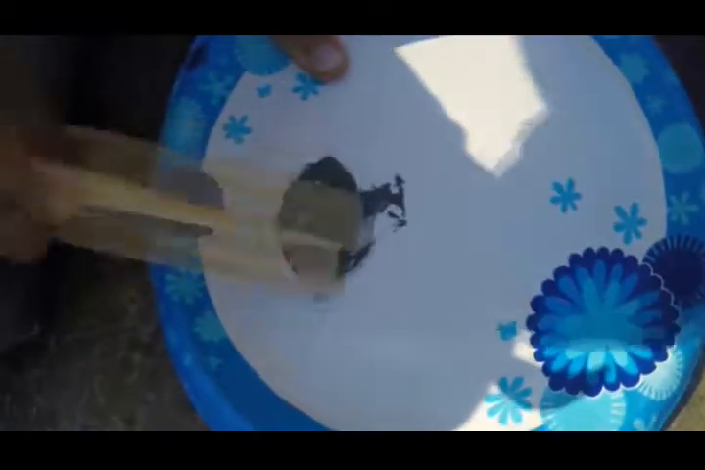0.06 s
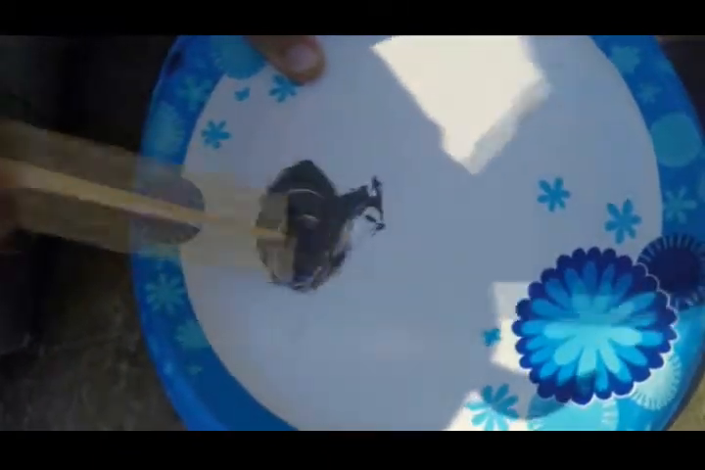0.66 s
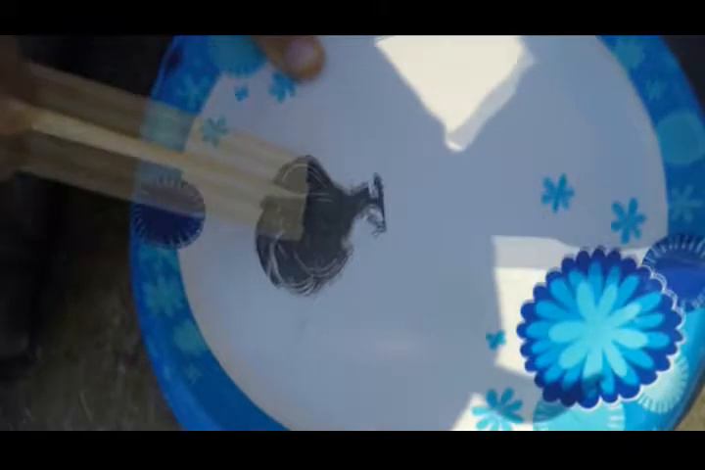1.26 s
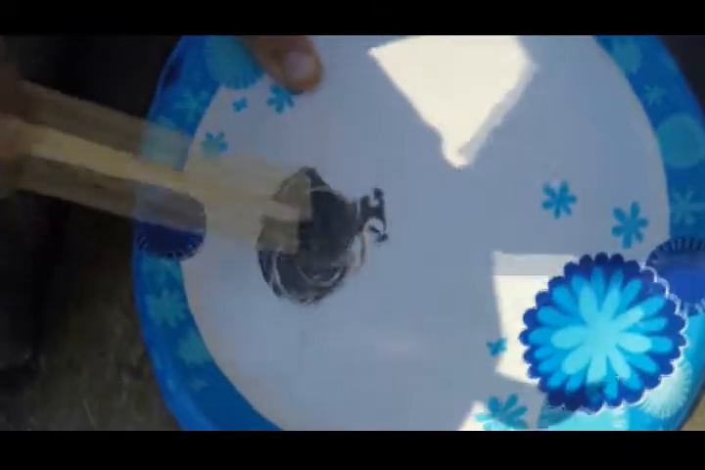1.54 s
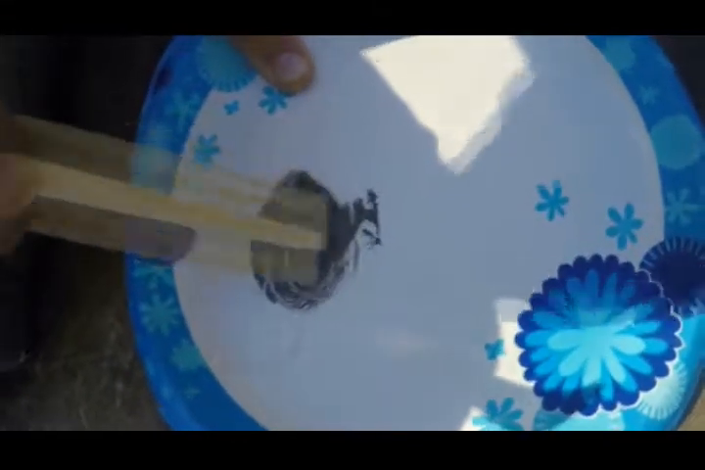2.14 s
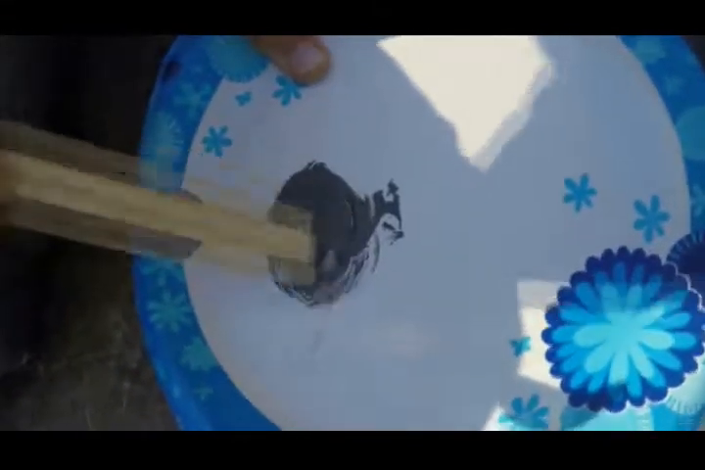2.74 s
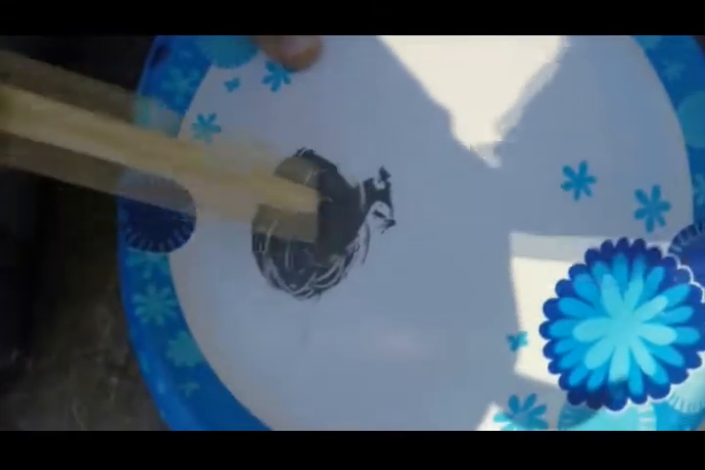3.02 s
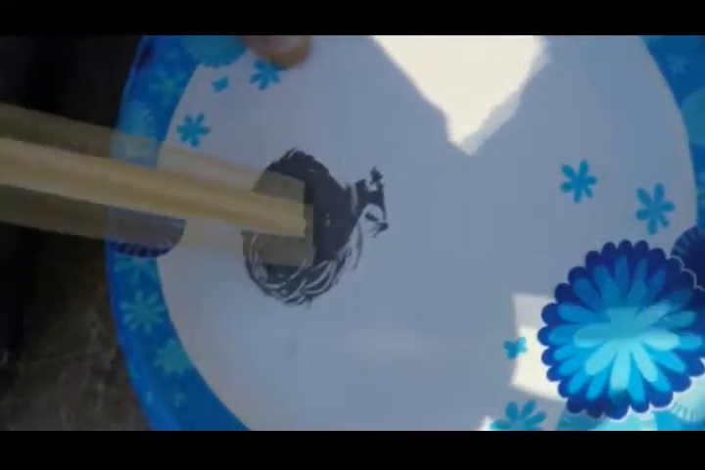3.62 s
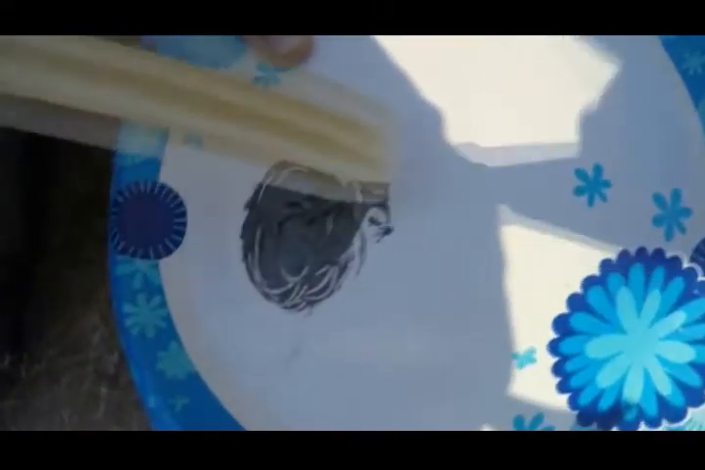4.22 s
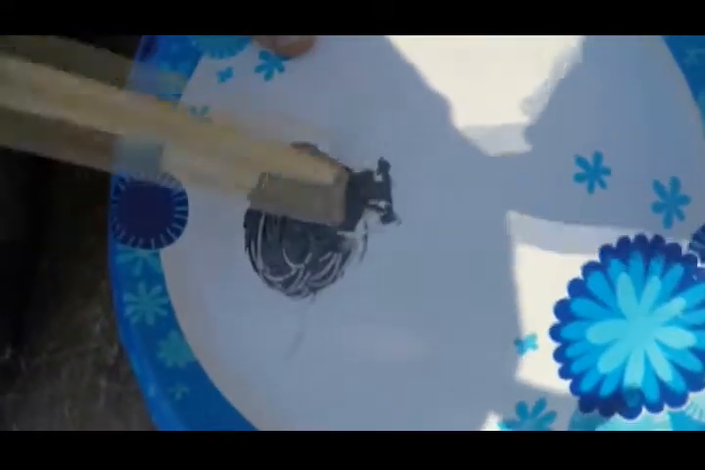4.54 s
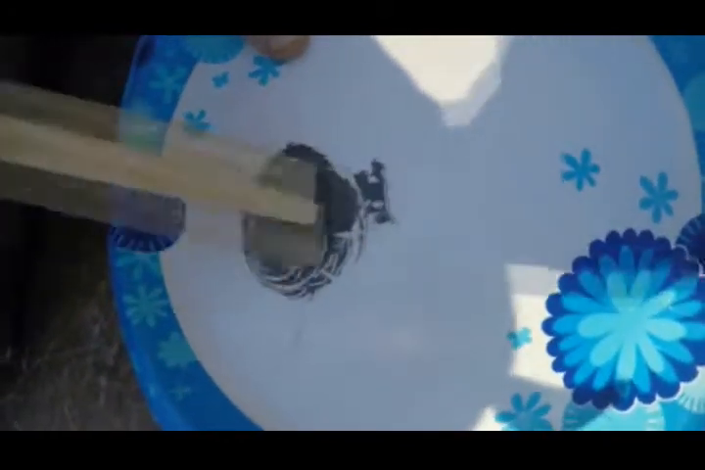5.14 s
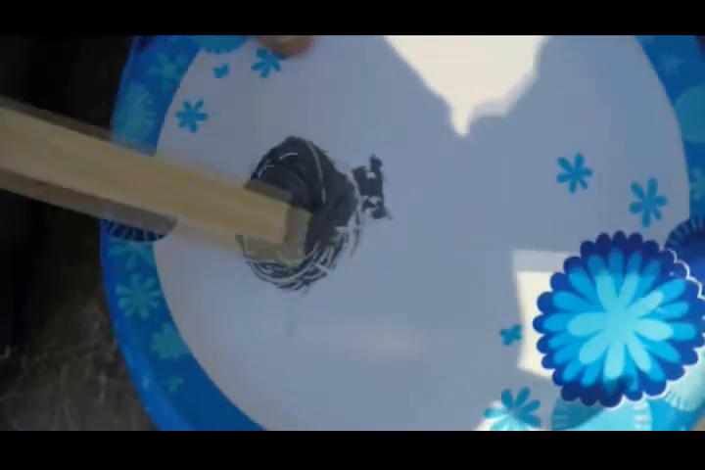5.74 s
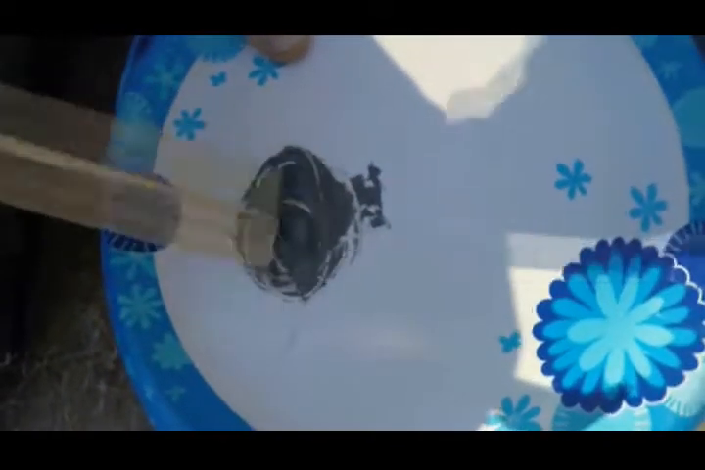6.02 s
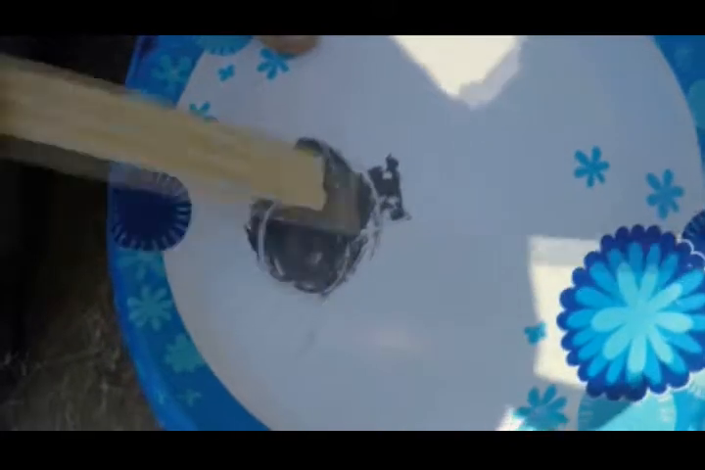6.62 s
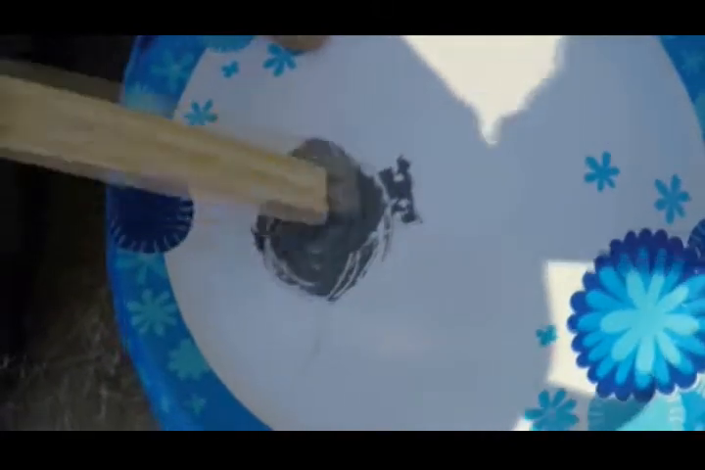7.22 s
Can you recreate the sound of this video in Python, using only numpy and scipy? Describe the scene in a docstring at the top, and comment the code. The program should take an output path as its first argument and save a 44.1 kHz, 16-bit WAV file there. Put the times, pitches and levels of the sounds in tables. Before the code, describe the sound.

Flat wooden sticks stir stiff putty on a hand-held paper plate, outdoors and close to the microphone. From the start, the paste drags with a quiet, fine hiss that swells with each push and crackles as sticky threads snap. Short, dry rasps come irregularly, often several a second, where wood bites the paper, some crisp and some slightly hollow. These thin out between about 2 and 3.5 seconds while the drag continues. The sticks lift at around 4.1 seconds and dip back at 4.5. Scraping carries on, with stronger strokes near 5.6 seconds, a tiny break at 7.1 and the sharpest scrape just after, continuing to about 7.5 seconds. Soft, deep handling knocks sit underneath, clearest near 0.1, 0.7, 1.3 and 3.2 seconds, with a lighter one at 6.4. A low breeze rumble on the microphone and a faint, even hiss run throughout.

```python
"""Stirring epoxy putty on a paper plate

Outdoors, close to the microphone, flat wooden sticks work stiff putty on a hand-held paper plate.
The putty drags with a fine hiss and crackles as its threads snap; where wood reaches paper it rasps
and rings sticks and plate. Underneath lie soft handling knocks, the low rumble of a breeze on the
microphone and an even hiss."""
import sys
import numpy as np
from scipy import signal
from scipy.fft import rfft, irfft
from scipy.io import wavfile
from scipy.ndimage import map_coordinates

SR = 44100
rng = np.random.default_rng(int(sys.argv[2]) if len(sys.argv) > 2 else 0)


def to_wav(sig):
    """Store sig (one row per channel, or 1-D mono) as 16-bit WAV at the path in sys.argv[1].

    Samples outside -1..1 are clipped; the rate is SR.
    """
    pcm = np.clip(np.atleast_2d(sig), -1, 1) * 32767
    pcm = np.round(pcm).astype(np.int16)
    wavfile.write(sys.argv[1], SR, pcm.T)  # frames by channels


N = 329250

# moving air on the microphone: (frequency [Hz], gain [dB])
RUMBLE_SPECTRUM = [(8, -52), (17, -1), (29, 0.5), (40, -1.5), (52, -8.5), (68, -13.5), (92, -18.5),
                   (120, -18), (160, -25), (240, -33), (500, -52)]
# still outdoor air and steady hiss: (frequency [Hz], gain [dB])
HISS_SPECTRUM = [(100, -6), (180, 0.5), (300, 0), (500, -2.5), (1000, -7), (2000, -6), (4000, -8),
                 (7000, -14.5), (11000, -18), (15500, -21.5)]
# spells with the sticks in the putty: (dip in [s], lift out [s])
STIR_SPELLS = [(-0.1, 4.14), (4.466, 7.11), (7.21, 7.6)]
# how hard the hand bears down, heard as steady drag: (time [s], relative level [dB])
HAND_EFFORT = [(0, -54.5), (0.4, -54.5), (0.9, -52.5), (1.1, -55), (1.35, -56), (1.55, -57), (2.2, -57),
               (3.0, -57), (3.45, -56), (3.9, -53.5), (4.6, -57), (5.1, -55.5), (5.44, -59), (5.6, -56.5),
               (6.3, -55.5), (6.8, -55.5), (7.47, -57.5)]
# the hand slows as it turns the stroke round: (time [s], level change [dB])
STROKE_TURNS = [(0.075, -4), (0.32, -1.5), (0.58, -1), (1.11, -3.5), (1.225, -1.5), (1.53, -1.5),
                (2.2, -2.5), (2.76, -2), (3.672, -3.5), (4.89, 0), (6.87, -1)]
# pushes through the thick of the lump: (time [s], relative level [dB], half-width [s])
LUMP_PUSHES = [(0.165, -52, 0.045), (0.42, -53, 0.023), (0.82, -64, .035), (0.93, -58, .03),
               (1.29, -54, 0.04), (1.37, -48.5, 0.025), (1.45, -50, 0.038), (1.64, -58, .06),
               (1.89, -54.5, 0.12), (2.1, -51.5, 0.022), (2.39, -54, 0.042), (2.52, -52.5, 0.038),
               (2.86, -53.5, .025), (4.485, -51, 0.051), (4.62, -55.5, 0.067), (4.75, -54.5, 0.079),
               (4.84, -58, 0.022), (5.09, -54, .06), (5.91, -60, .04), (6.11, -52.5, 0.031),
               (6.5, -53, 0.02), (6.92, -56, 0.031), (7.225, -45.5, 0.015)]
# friction heard straight from the contact: (frequency [Hz], gain [dB])
FRICTION_SPECTRUM = [(150, 3), (400, -2.5), (900, 9.5), (1400, -9), (3000, 1.5), (5000, -4.5), (7500, -0.5),
                     (9200, -12.5), (12000, -7.5), (15500, -19)]
# resonances of sticks and plate: (frequency [Hz], bandwidth [Hz], putty gain [dB], paper gain [dB])
STICK_PLATE_MODES = [(688, 120, -28, -11.5), (1080, 230, -18, -9), (1758, 96, -9, 3), (1887, 73, -17, -5.5),
                     (2524, 128, -10, -1.5), (2706, 187, -9, -0.5), (3126, 510, -6, -0.5),
                     (3541, 276, 1, 2.5), (4340, 230, 0, -2.5), (4600, 216, 2, -29), (4870, 260, -6, -9),
                     (5610, 180, -22, -7.5), (6030, 400, -13.5, -17), (6550, 150, -11.5, -12),
                     (6960, 700, -12, -22.5), (8500, 1130, -17.5, -24), (9820, 780, -20.5, -34)]
# strokes where wood bites into paper:
# (time [s], level [dB], half-width [s], relative brightness [dB], relative hollowness [dB])
PAPER_SCRAPES = [(0.137, -47, 0.02, 0, -16), (0.254, -46, 0.021, -12, -6), (.384, -49.5, 0.025, -1, -6),
                 (0.505, -48, 0.025, -7, -4), (0.638, -47.5, 0.035, -4, -12), (0.758, -49.5, 0.028, -3, -5),
                 (0.91, -51, 0.02, -12, -8), (1.05, -42.5, 0.017, -2, -16), (1.18, -44.5, 0.02, -3, -7),
                 (1.309, -52, 0.02, 0, -14), (1.458, -49, 0.018, -1, -12), (1.609, -48, 0.032, -4, -7),
                 (1.735, -50.5, 0.027, -11, -9), (2.372, -49, .018, -3, -6),
                 (3.612, -44.5, 0.024, -7, -2.5), (3.717, -43.5, 0.014, -12, -8.5),
                 (3.856, -50, .018, -12, -14), (4.415, -50.5, 0.017, -8, -16),
                 (4.471, -46.5, .006, -10, -14), (4.485, -49, .011, -11, -14),
                 (4.517, -50.5, .018, -4, -12), (4.726, -51.5, 0.035, -2, -7),
                 (5.138, -43.5, 0.015, -11, -10), (5.253, -50, 0.024, -9, -5), (5.38, -49, 0.016, -12, -14),
                 (5.543, -42, 0.028, -1, -21), (5.591, -43, 0.018, -2, -3.5),
                 (5.892, -45.5, 0.021, -12, -5), (6.003, -49, 0.03, -4, -9),
                 (6.365, -45.5, 0.015, -6, -3.5), (6.616, -45.5, 0.025, -12, -12),
                 (6.747, -47.5, 0.021, -1, -9), (7.227, -38.5, 0.015, -3, -7), (7.278, -45, .024, -5, -9),
                 (7.398, -46.5, 0.021, -5, -3)]
# tearing threads of putty: (frequency [Hz], gain [dB])
CRACKLE_SPECTRUM = [(2000, -28), (4500, -7), (6000, 3.5), (7300, -1), (9000, -5), (13000, -12),
                    (15500, -24)]
# bands in which the threads snap: (frequency [Hz])
THREAD_BANDS = [5170, 5980, 6630, 7340, 8000, 10000]
# a stick peels off the putty in a flurry of snapping threads: (time [s], relative level [dB])
STICK_PEELS = [(0.22, -56), (0.47, -53), (0.73, -51), (2.53, -51), (3.32, -54), (3.54, -53), (3.8, -53),
               (4.045, -51.5), (6.29, -49.5), (5.56, -53), (7.04, -55), (7.23, -57)]
# soft handling knocks:
# (time [s], relative force [dB], contact half-width [s], relative shudder [dB], shudder half-width [s])
HANDLING_KNOCKS = [(0.108, -27.5, 0.0024, -33.5, .025), (.735, -23.5, 0.0025, -40, 0.013),
                   (1.257, -24.5, 0.002, -28.5, 0.041), (1.836, -39, 0.0012, -45, .02),
                   (2.061, -36, .0028, -47, .02), (2.469, -31, .003, -42, 0.013),
                   (2.886, -28, .005, -42, .025), (3.223, -25.5, 0.0021, -30.5, .055),
                   (3.999, -32, 0.0036, -47.5, 0.023), (6.42, -32, 0.0024, -38.5, 0.029)]
# what the knocks ring with: (frequency [Hz], bandwidth [Hz], relative gain [dB])
THUD_MODES = [(45.5, 37.5, 1), (78, 31, -6), (116, 40, 0.5)]
# force of the plate shifting in the fingers: (frequency [Hz], gain [dB])
SHUDDER_SPECTRUM = [(15, -4), (40, 3.5), (85, 1.5), (130, -4.5), (190, -18), (300, -19.5), (600, -23),
                    (2000, -70)]

RUMBLE_DB, RUMBLE_DB_PER_S = -39.5, -0.224  # the breeze slowly eases
DIP_S, LIFT_S, LIFTED_DB = 0.003, 0.021, -28  # how fast the drag comes and goes; what is left lifted
TURN_S, PEEL_S = 0.035, 0.029  # half-widths
CONTACT_DB_PER_S = 0.36  # the putty thins as it is spread, so the paper is heard more
HOLLOW_DB_PER_OCTAVE = -6.5  # a stroke that flexes the whole plate favours its low resonances
SHUDDER_LAG_S = 0.0084  # the shudder is strongest just after the knock
TOP_HZ = 15300


def undb(db):
    """Decibels to gain."""
    return 10 ** (np.asarray(db) / 20)


def power_db(power):
    """Power to decibels."""
    return 10 * np.log10(power + 1e-12)


def unit(x):
    """Scale to rms 1."""
    return x / np.sqrt(np.mean(x ** 2))


def colour(x, points):
    """Filter by a spectrum of (frequency [Hz], gain [dB]) points."""
    hz, db = np.transpose(points)
    freqs = np.maximum(np.fft.rfftfreq(N, 1 / SR), 1)
    return irfft(rfft(x) * undb(np.interp(np.log(freqs), np.log(hz), db)), N)


def resonate(x, hz, width):
    """One damped resonance, gain 1 at its centre."""
    return signal.lfilter(*signal.iirpeak(hz, hz / width, fs=SR), x)


def wander(per_s):
    """Smooth random drift with a spread near 1."""
    steps = rng.standard_normal(4096)
    coarse = np.arange(0, N + 32, 32)
    curve = map_coordinates(steps, [coarse / SR * per_s], order=3, mode="wrap")
    return np.interp(np.arange(N), coarse, curve)


def bump(s, width):
    """A smooth swell of height 1 around time s, falling to 1 / e within width seconds."""
    out = np.zeros(N)
    near = np.arange(max(0, int((s - 4 * width) * SR)), min(N, int((s + 4 * width) * SR)))
    out[near] = np.exp(-((near / SR - s) / width) ** 2)
    return out


def swells(rows):
    """Summed power of smooth swells given as (time [s], level [dB], half-width [s])."""
    return sum(undb(db) ** 2 * bump(s, width) for s, db, width in rows)


def outdoor_air():
    """A breeze rumbles unsteadily on the microphone, under an even hiss."""
    breeze_db = RUMBLE_DB + RUMBLE_DB_PER_S * np.arange(N) / SR
    rumble = unit(colour(rng.standard_normal(N), RUMBLE_SPECTRUM)) * undb(breeze_db + 0.7 * wander(8.2))
    hiss = unit(colour(rng.standard_normal(N), HISS_SPECTRUM)) * undb(-54)
    return rumble + hiss


def stick_contact(t):
    """1 while the sticks are in the putty; they dip in quickly and pull free more slowly."""
    inside = sum((1 + np.tanh((t - down) / DIP_S)) * (1 - np.tanh((t - up) / LIFT_S)) / 4
                 for down, up in STIR_SPELLS)
    return np.maximum(inside, undb(LIFTED_DB))


def slips(per_s, spread_db, smooth):
    """Tiny stick-slip releases of uneven size, over a share of smooth sliding."""
    happens = rng.random(N) < per_s / SR
    sizes = undb(spread_db * np.clip(rng.standard_normal(N), -2, 2)) * rng.choice([-1, 1], N)
    return unit(unit(happens * sizes) + smooth * rng.standard_normal(N))


def sticks_and_plate(force, gains_db, drift_db, direct_db):
    """Friction rings sticks and plate; each resonance waxes and wanes as the contact point travels."""
    out = undb(direct_db) * colour(force, FRICTION_SPECTRUM)
    for (hz, width, _, _), db in zip(STICK_PLATE_MODES, gains_db):
        # a broad second filter keeps the valleys between resonances dark
        ring = resonate(resonate(force, hz, width), hz, min(4 * width, hz))
        out = out + ring * undb(db + drift_db * wander(18))
    return out


def putty_drag(drag_db):
    """Stiff paste shears and tears in countless fine threads: a fine hiss at close range."""
    force = slips(per_s=2200, spread_db=2.5, smooth=0.58)
    gains_db = [db for _, _, db, _ in STICK_PLATE_MODES]
    drag = sticks_and_plate(force, gains_db, drift_db=2, direct_db=-21)
    return unit(drag) * undb(drag_db + 2.5 + 1.5 * wander(55))


def paper_rasp(rub_db):
    """Wood rubs over paper fibres: lightly all the time, hard in short strokes."""
    rasp_power = undb(rub_db) ** 2 + swells([row[:3] for row in PAPER_SCRAPES])
    force = slips(per_s=2400, spread_db=3, smooth=0.49) * undb(0.98 * wander(170))
    gains_db = [db for _, _, _, db in STICK_PLATE_MODES]
    rasp = sticks_and_plate(force, gains_db, drift_db=2.5, direct_db=-15)
    # the sharp edge of a stick adds a crisp top
    edge_power = swells([(s, db + bright_db, width) for s, db, width, bright_db, _ in PAPER_SCRAPES])
    crisp = colour(force, [(2500, -25), (4500, -5), (6500, 3), (8500, 0), (10500, -4), (15000, -21)])
    # its flat face catches more coarsely and makes the plate sound hollow
    flex_power = swells([(s, db + hollow_db, width) for s, db, width, _, hollow_db in PAPER_SCRAPES])
    lowest_hz = STICK_PLATE_MODES[0][0]
    flex_db = [db + HOLLOW_DB_PER_OCTAVE * np.log2(hz / lowest_hz) for hz, _, _, db in STICK_PLATE_MODES]
    coarse_force = slips(per_s=1200, spread_db=4.5, smooth=0.4)
    hollow = sticks_and_plate(coarse_force, flex_db, drift_db=2.5, direct_db=-27)
    return (unit(rasp) * np.sqrt(rasp_power)
            + undb(-14.5) * unit(crisp) * np.sqrt(edge_power)
            + undb(-2) * unit(hollow) * np.sqrt(flex_power))


def thread_crackle(sticky_db):
    """Sticky threads snap behind the sticks, each band of pitch in its own small flurries."""
    snaps = slips(per_s=800, spread_db=3, smooth=1) * undb(2.16 * wander(30))
    flurries = sum(resonate(snaps, hz, width=550) * undb(5.8 * wander(25)) for hz in THREAD_BANDS)
    return unit(colour(snaps + undb(-4) * flurries, CRACKLE_SPECTRUM)) * undb(sticky_db - 5.5)


def handling_knocks():
    """Each soft push sets off a short, deep thud, and the plate shudders in the fingers around it."""
    push = -sum(undb(db) * bump(s, contact) for s, db, contact, _, _ in HANDLING_KNOCKS)
    shudder_power = swells([(s + SHUDDER_LAG_S, db, width) for s, _, _, db, width in HANDLING_KNOCKS])
    shudder = unit(colour(rng.standard_normal(N), SHUDDER_SPECTRUM)) * np.sqrt(shudder_power)
    force = push + undb(-6.5) * shudder
    return undb(4.5) * sum(undb(db) * resonate(force, hz, width) for hz, width, db in THUD_MODES)


def scene():
    """At one close microphone: the hand's effort drives drag, rasp and crackle over knocks and air."""
    t = np.arange(N) / SR
    turns_db = sum(db * bump(s, TURN_S) for s, db in STROKE_TURNS)
    effort_db = np.interp(t, *np.transpose(HAND_EFFORT)) + turns_db
    touching = stick_contact(t) ** 2
    steady_power = touching * undb(effort_db) ** 2
    push_power = touching * swells(LUMP_PUSHES)
    peel_power = swells([(s, db, PEEL_S) for s, db in STICK_PEELS])
    sticky_power = steady_power * undb(-3) ** 2 + push_power * undb(-5.5) ** 2 + peel_power
    drag = putty_drag(power_db(steady_power + push_power))
    rasp = paper_rasp(power_db(steady_power) + CONTACT_DB_PER_S * t)
    crackle = thread_crackle(power_db(sticky_power))
    return (drag + rasp + crackle + handling_knocks() + outdoor_air())[None]


def record(dry):
    """The recorder cuts the top steeply."""
    return signal.sosfilt(signal.ellip(10, 0.2, 70, TOP_HZ, fs=SR, output="sos"), dry)


dry = scene()
out = record(dry)
to_wav(out)
```